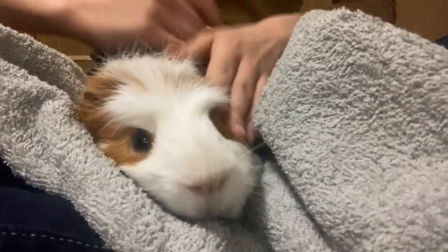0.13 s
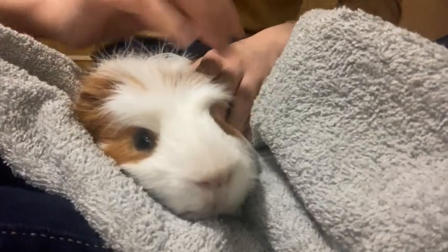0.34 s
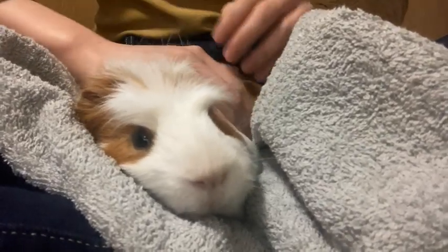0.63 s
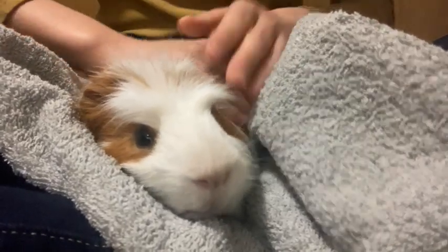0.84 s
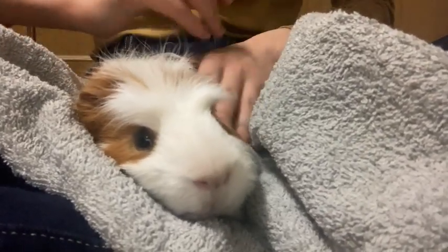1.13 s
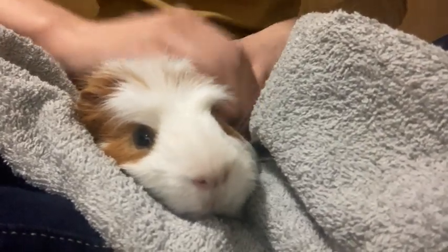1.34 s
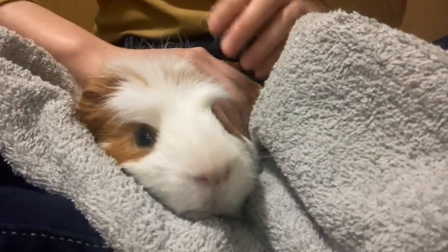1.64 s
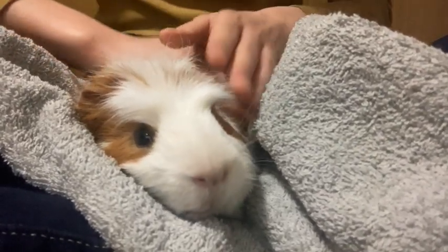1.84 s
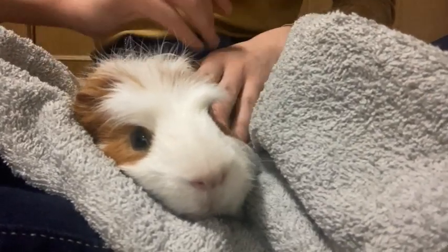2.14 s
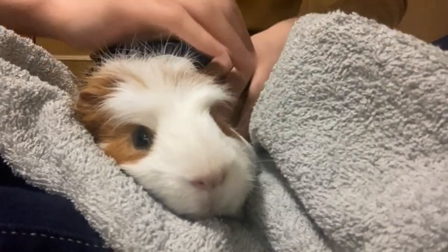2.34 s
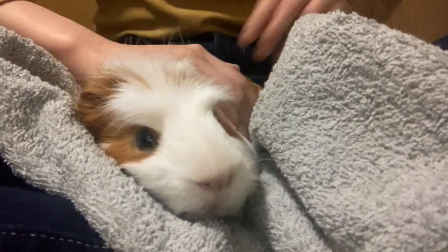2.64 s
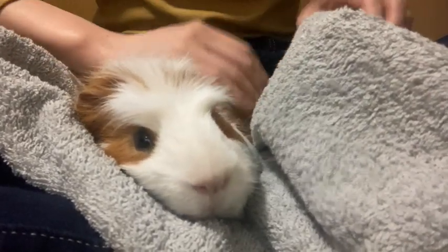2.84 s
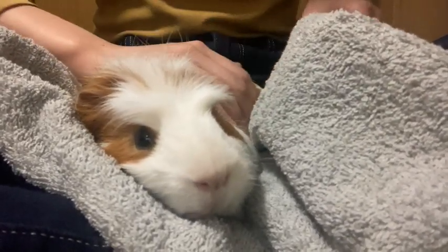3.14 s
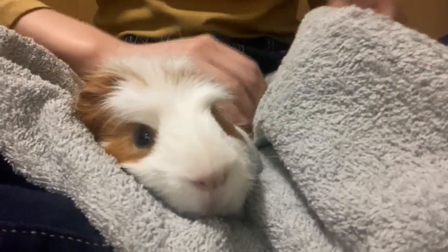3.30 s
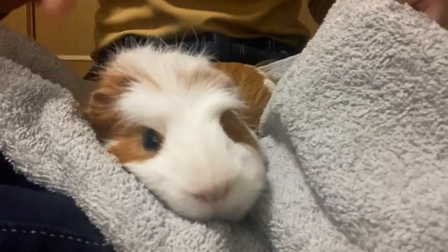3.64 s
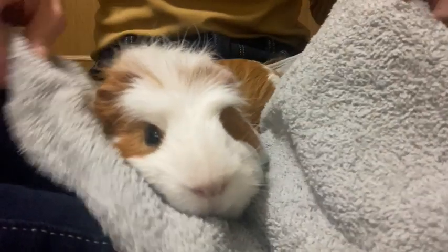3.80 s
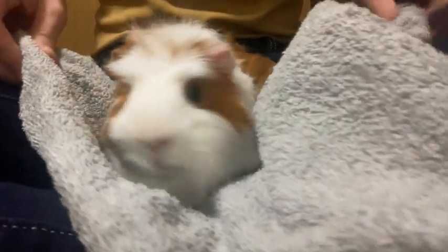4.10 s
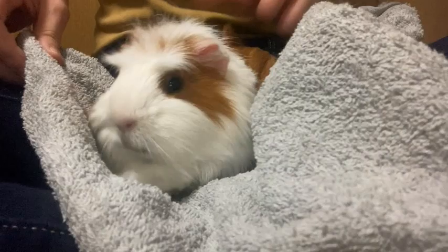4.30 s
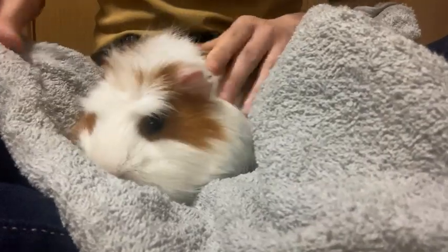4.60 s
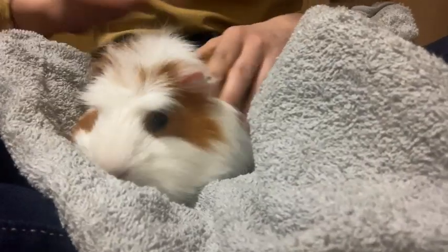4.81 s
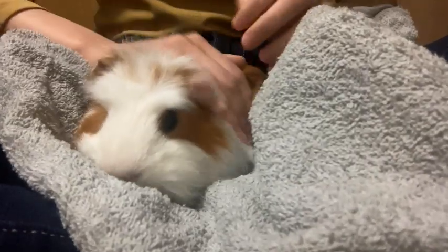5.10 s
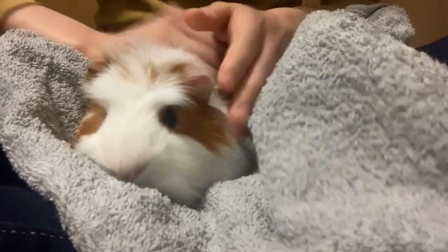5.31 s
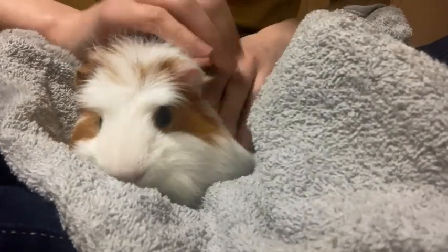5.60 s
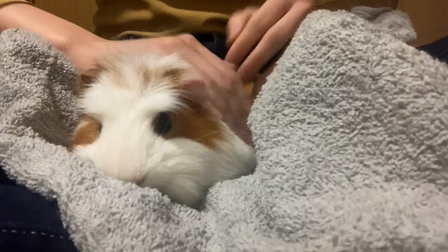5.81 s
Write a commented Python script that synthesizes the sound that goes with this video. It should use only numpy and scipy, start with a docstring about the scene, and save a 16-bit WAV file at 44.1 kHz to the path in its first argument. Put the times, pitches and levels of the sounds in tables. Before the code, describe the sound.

Soft, quick guinea pig chutting with little whistled flicks, over gentle fur and towel rustle and one towel shift, in a small indoor space.

```python
"""A small quiet room: a guinea pig wrapped in a towel on a lap chatters softly while a hand strokes its fur.
Most bouts open with one nasal swoop (catch, crest, trough, flick up to a whistle) and go on as a lower warble.
The voice is a sum of harmonics, strongest at mid pitch and rough at the bottom; lone flaps ring as creaks.
Fur and towel are shaped noise that swells with each stroke. Near four seconds the towel is shifted,
then the animal turns its head. Low room modes, short reflections and shaped air noise lie behind."""
import sys
import numpy as np
from scipy import signal
from scipy.fft import rfft, irfft
from scipy.io import wavfile
from scipy.ndimage import uniform_filter1d

SR = 44100
rng = np.random.default_rng(int(sys.argv[2]) if len(sys.argv) > 2 else 0)


def waveform_to_disk(signal):
    """Save audio, clipped to [-1, 1], as 16-bit WAV at the path in sys.argv[1]."""
    frames = np.transpose(np.atleast_2d(signal))
    scaled = np.clip(frames, -1, 1) * 32767
    samples = np.round(scaled).astype(np.int16)
    wavfile.write(sys.argv[1], SR, samples)


N = 262395
TIME = np.arange(N) / SR

# a near source at the two microphone ports, head forward: frequency_hz, left_minus_right_db
FORWARD_BALANCE = [(450, 0), (700, -2), (1000, -6), (1500, -13.5), (2000, -16.5), (2500, 2.5),
                   (3400, -12.5), (5500, -0.5)]
# the same place: frequency_hz, left_lead_radians
FORWARD_PHASE = [(100, -.1), (800, -.8), (1500, -.6), (2000, -1.8), (2800, -2.8), (3400, -2.5), (3900, 0),
                 (5700, 3), (8900, 6.2), (13500, 12.4), (16000, 15)]


def gain_of(db):
    """Decibels to an amplitude factor."""
    return 10 ** (np.asarray(db) / 20)


def evened(x):
    """Scaled to rms 1."""
    return x / np.sqrt(np.mean(x ** 2) + 1e-20)


def read(points, hz):
    """A table joined by straight lines on a log-frequency axis."""
    f, value = np.transpose(points)
    return np.interp(np.log(hz + 1), np.log(f + 1), value)


def add(mix, s, sound):
    """Lays a sound into the mix at time s."""
    part = mix[max(round(s * SR), 0):][:len(sound)]
    part += sound[:len(part)]


def colour(x, spectrum):
    """Filters by a table of frequency_hz, gain_db."""
    hz = np.fft.rfftfreq(N, 1 / SR)
    return irfft(rfft(x) * gain_of(read(spectrum, hz)), N)


def wander(rate_hz):
    """Smooth chance of rms 1: noise that fades out above the given rate."""
    hz = np.fft.rfftfreq(N, 1 / SR)
    return evened(irfft(rfft(rng.standard_normal(N)) / (1 + (hz / rate_hz) ** 4), N))


def noise_pair(side):
    """Left and right noise: a shared part plus an opposed part."""
    shared, opposed = rng.standard_normal((2, N))
    return np.array([shared + side * opposed, shared - side * opposed])


def ports(x, balance, lead):
    """The two microphone ports hear a near source with different level and phase."""
    hz = np.fft.rfftfreq(N, 1 / SR)
    tilt = gain_of(read(balance, hz) / 2) * np.exp(.5j * read(lead, hz))
    pair = np.array([tilt, 1 / tilt])
    power = np.mean(abs(pair) ** 2, 0)
    return irfft(rfft(x) * pair / np.sqrt(power), N)


def background(level_db=-70.5, lump_db=3):
    """Quiet room air as shaped noise; its rumble comes in soft lumps."""
    # spectrum of the room air: frequency_hz, relative_density_db
    air_spectrum = [(20, -20), (52, 8.5), (100, 0), (170, -7.5), (2000, -26), (7300, -35.5), (9000, -47),
                    (15500, -39)]
    air = gain_of(level_db) * evened(colour(noise_pair(0.26), air_spectrum))
    low_pass = signal.butter(2, 200, fs=SR, output="sos")
    rumble = signal.sosfiltfilt(low_pass, air)
    lumps = evened(gain_of(lump_db * wander(20.0)))
    return air - rumble + rumble * lumps


def scatter(wet_db, t60):
    """Sparse reflections that die away, different at each port."""
    t = np.arange(SR // 2) / SR
    taps = rng.standard_normal((2, len(t)))
    taps *= rng.random((2, len(t))) < .05  # one sample in twenty carries a reflection
    taps *= gain_of(-60 * t / t60) * (t > .003)
    return gain_of(wet_db) * taps / np.linalg.norm(taps[0])


def reflections(x):
    """A stronger and a fainter set of short reflections from the lap and the walls."""
    response = scatter(wet_db=-14, t60=0.19) + scatter(wet_db=-19, t60=0.16)
    return signal.fftconvolve(x[None], response, axes=1)[:, :N]


def ringing(x, modes_db=22.5):
    """Low modes of the room ring on when the pitch sweeps through them."""
    # low room resonances: frequency_hz, relative_level_db, t60_s
    room_modes = [(254.4, -8.5, 0.2), (294.6, -15.5, 0.23), (394.7, -26.5, 0.24), (434.2, -28.5, 0.33)]
    t = np.arange(SR // 2) / SR
    response = np.zeros(len(t))
    for hz, db, t60 in room_modes:
        even_peak = 2 * np.log(1000) / (t60 * SR)  # long and short rings get equal resonant gain
        response += gain_of(db - 60 * t / t60) * np.cos(2 * np.pi * hz * t) * even_peak
    return gain_of(modes_db) * signal.fftconvolve(x, response)[:N]


def rubbing(swell, lag_s=0.062, fullness=0.38):
    """Strength of rustle and fizz: the resting hand, the quiver of each call, and one arch for each stroke."""
    # firm strokes on fur and towel, before the trims: start_s, length_s, rustle_db, fine_fizz_db
    stroke_rows = [(-.05, 0.12, -69.5, -66), (0.402, 0.12, -79.5, -69.5), (0.773, 0.2, -75.5, -69),
                   (1.411, 0.29, -76, -71), (1.75, 0.2, -79.5, -65), (2.017, 0.048, -102, -73.5),
                   (2.85, 0.58, -76, -82), (3.688, 0.14, -66.5, -64.5), (3.818, .29, -65, -64),
                   (4.022, 0.14, -66.5, -73.5), (4.036, .012, -58.5, -76), (4.42, 0.1925, -77, -71),
                   (4.437, 0.063, -69, -68), (4.557, 0.063, -72.5, -66.5), (4.998, 0.34, -79.5, -74),
                   (5.2, .26, -101, -66)]
    # the hand lying on the fur, before the trims: rustle_db, fine_fizz_db
    rest_levels = (-88, -80)
    # the body rubs the towel as it calls, relative to the swell, before the trims: rustle_db, fine_fizz_db
    quiver_levels = (-38.5, -35)
    quiver = uniform_filter1d(swell, max(int(lag_s * SR), 1))
    power = gain_of(rest_levels)[:, None] ** 2 + np.outer(gain_of(quiver_levels), quiver) ** 2
    for start, length, *levels_db in stroke_rows:
        at = np.flatnonzero((TIME > start) & (TIME < start + length))
        arch = abs(np.sin(np.pi * (TIME[at] - start) / length)) ** fullness
        power[:, at] += np.outer(gain_of(levels_db), arch) ** 2
    return np.sqrt(power)


def stroking(swell, cloth_db=8, fizz_db=-1, grain_db=1.0, snag_db=-6, diffuse=0.53):
    """Countless fibres slip under the hand: a soft rustle, a fine fizz and a few snags."""
    # rustle spectrum: frequency_hz, relative_density_db
    cloth_spectrum = [(120, 1.5), (280, 17.5), (800, 6), (2500, 8), (4200, 1.5), (7500, -4.5), (9000, -1.5),
                      (15000, -25)]
    # fizz spectrum: frequency_hz, relative_density_db
    fizz_spectrum = [(5000, -10), (7700, -10), (8300, 3), (11000, 0.5), (13000, -5), (16000, -0.5)]
    # hairs and towel loops snapping free, before the snag trim: start_s, peak_db, nominal_length_s
    snag_rows = [(1.092, -49.5, 0.0037), (1.134, -57, 0.013), (1.207, -52.5, 0.0067),
                 (1.243, -55.5, 0.0098), (1.444, -53.5, 0.017), (1.534, -54.5, 0.0066),
                 (1.569, -51.5, 0.0057), (2.195, -55, 0.0083), (2.639, -55.5, 0.0058), (3.056, -56, 0.0054),
                 (3.55, -57, 0.0067), (3.6406, -47, .0032), (4.3987, -54.5, 0.0039)]
    rustle, fine = rubbing(swell)
    grain = evened(gain_of(grain_db * wander(250) + 0.74 * wander(34)))
    snags = np.zeros(N)
    for start, peak_db, length in snag_rows:
        u = np.arange(SR // 16) / SR / max(length / 2, .001)
        add(snags, start, gain_of(peak_db + snag_db) * u * np.exp(1 - u))
    cloth = rustle * gain_of(cloth_db) * grain
    fizz = np.hypot(fine * gain_of(fizz_db), snags) * grain
    # three independent noises: one placed under the hand, two spread left and right
    cloth_noise = evened(colour(rng.standard_normal((3, N)), cloth_spectrum))
    fizz_noise = evened(colour(rng.standard_normal((3, N)), fizz_spectrum))
    near, *scattered = cloth * cloth_noise + fizz * fizz_noise
    return ports(near, FORWARD_BALANCE, FORWARD_PHASE) + diffuse * np.array(scattered)


def thuds(centre_hz=263.8, detune=0.04):
    """Each soft thud is a few swelling and fading cycles of one low tone."""
    # low thuds among the calls and the handling: start_s, length_s, peak_db
    thud_rows = [(2.752, .03, -50), (3.238, 0.029, -48.5), (3.958, 0.022, -44.5), (4.17, .014, -57.5),
                 (4.379, 0.027, -45), (4.966, 0.031, -52.5)]
    out = np.zeros(N)
    for (s, length, db), off in zip(thud_rows, rng.standard_normal(len(thud_rows))):
        t = np.arange(0, length, 1 / SR)
        tone = np.sin(2 * np.pi * centre_hz * (1 + detune * off) * t)
        add(out, s, gain_of(db) * np.sin(np.pi * t / length) * tone)
    return out


def creak_run(start, end, first_rate, last_rate, peak_db, stumble_s=0.00081, spread_db=2):
    """Times and strengths of flaps that come ever faster, a little unevenly."""
    t = np.arange(start, end, 1 / SR)
    rate = np.linspace(first_rate, last_rate, len(t))
    cycles = np.floor(np.cumsum(rate) / SR)
    times = t[np.diff(cycles, prepend=-1) > 0]
    chance = rng.standard_normal(size=(32, 2))
    return [(s + stumble_s * late, peak_db + spread_db * size) for s, (late, size) in zip(times, chance)]


def creaks(trim_db=-3, detune=.12, spread_db=3):
    """Each lone flap of the vocal folds rings the throat for a few milliseconds, never twice alike."""
    # what a flap rings in throat and nose, before chance: frequency_hz, relative_level_db, t60_s
    flap_modes = [(251.4, -9.5, 0.12), (554.8, 6.5, 0.032), (1060.6, -0.5, 0.02), (2054, -3.5, 0.013)]
    # single slow flaps before a call: start_s, peak_db before the trim
    lone_flaps = [(.11, -36), (.488, -35), (1.777, -39.5), (2.138, -35), (4.174, -49.5), (4.331, -35),
                  (4.932, -48), (5.287, -45), (5.523, -44.5), (5.545, -35)]
    # a quickening run of flaps: start_s, end_s, first_flaps_per_s, last_flaps_per_s, peak_db before spread and trim
    quickening = (4.949, 5.024, 130, 200, -38.5)
    out, t = np.zeros(N), np.arange(SR // 16) / SR
    flaps = list(lone_flaps) + creak_run(*quickening)
    chances = rng.standard_normal(size=(40, len(flap_modes), 3))
    for (s, db), chance in zip(flaps, chances):
        ring = np.zeros(len(t))
        for (hz, mode_db, t60), (off, size, phase) in zip(flap_modes, chance):
            decay = gain_of(mode_db + spread_db * size - 60 * t / t60)
            ring += decay * np.sin(2 * np.pi * (hz * (1 + detune * off) * t + phase))
        ring *= 1 - np.exp(-(t / 0.0003) ** 2)  # soft onset
        add(out, s, gain_of(db + trim_db) * ring / abs(ring).max())
    return out


def glide(s, value, t):
    """A smooth curve through the rows that levels off at each turning point."""
    slope = np.diff(value) / np.maximum(np.diff(s), 1e-4)
    before, after = np.r_[slope[0], slope], np.r_[slope, slope[-1]]
    same_way = before * after > 0
    tangent = np.sign(before) * np.minimum(abs(before), abs(after)) * same_way
    i = np.clip(np.searchsorted(s, t) - 1, 0, len(s) - 2)
    span = s[i + 1] - s[i]
    u = np.clip((t - s[i]) / (span + 1e-9), 0, 1)
    bow = (1 - u) * (tangent[i] - slope[i]) - u * (tangent[i + 1] - slope[i])
    return np.interp(t, s, value) + span * u * (1 - u) * bow


def swoop(start, length, crest_at, trough_at, catch_hz, crest_hz, trough_hz, top_hz, level_db, rough, release_s):
    """The pitch catches low, arches, sags, then flicks up to a whistle and is let go."""
    catch_at, catch_drop = 0.27, 1.3  # the catch's share of the way to the crest; start pitch over catch pitch
    rise_db = 2.5  # a swoop gathers strength up to its listed level
    s = start + length * np.array([0, catch_at * crest_at, crest_at, trough_at, 1])
    turns = list(zip(s, [catch_drop * catch_hz, catch_hz, crest_hz, trough_hz, top_hz]))
    turns.append((s[-1] + release_s / 2, top_hz))
    return level_db - rise_db, rise_db, rough, turns


def calling(release_s=.008):
    """Pitch, strength and roughness of the voice through time; strength falls away from the easy pitch."""
    # opening swoops, level before pitch losses and voice gain: start_s, length_s, crest_at_0_to_1, trough_at_0_to_1,
    # catch_hz, crest_hz, trough_hz, top_hz, end_level_db, base_roughness_0_to_1
    swoop_rows = [ (0.375, 0.091, 0.21, 0.59, 378.8, 656.3, 417, 892.7, -43, 0.09),
                  (0.800, 0.079, 0.32, 0.67, 313, 700, 304.4, 867, -37.5, 0.19),
                  (1.085, 0.097, 0.24, 0.64, 431.9, 583, 353.3, 1125, -34.5, 0.2),
                  (1.400, 0.084, 0.2, 0.81, 542, 591.6, 389.5, 1248, -35.5, .1),
                  (1.777, 0.094, 0.32, 0.74, 368.2, 595, 312.4, 1277, -36, 0),
                  (2.138, 0.094, 0.31, 0.72, 274.2, 569.8, 365.6, 1170, -35.5, 0.14),
                  (2.587, .091, .28, .64, 300.3, 742, 337, 1171, -39, .2),
                  (2.995, 0.093, 0.29, 0.62, 371.1, 721, 340.3, 1027, -37.5, 0.3),
                  (3.418, 0.085, 0.26, 0.67, 281.5, 705.8, 376.8, 1260, -36, 0.36), ]
    # warbles, level before pitch losses and voice gain:
    # start_level_db, change_by_end_db, base_roughness_0_to_1, pitch turns as (time_s, pitch_hz)
    warble_rows = [ (-35, -6.5, 0.039, [(0, 424), (.035, 382), (.06, 544), (.076, 450)]),
                   (-45, -2.5, 0.18, [(.11, 457), (.119, 260), (.133, 566), (.168, 436), (.192, 736)]),
                   (-41.5, 5, 0.11, [(.488, 528.4), (.508, 354), (.527, 536), (.541, 458), (.556, 597),
                   (.581, 514), (.599, 841), (.623, 443), (.644, 442.4), (.667, 1050)]),
                   (-36, -5, 0.26, [(.88, 855), (.899, 508.2), (.91, 543.4), (.924, 374.3), (.957, 541.3),
                   (.972, 851)]), (-34.5, 0, .25, [(1.197, 661.5), (1.211, 400), (1.227, 501), (1.245, 341),
                   (1.258, 617.3), (1.283, 878)]), (-39, 1.5, 0.044, [(1.51, 641), (1.523, 383),
                   (1.55, 423.7), (1.575, 619.7), (1.59, 1049), (1.612, 618), (1.629, 404.5), (1.646, 508),
                   (1.663, 927)]), (-36.5, -8.5, 0.34, [(1.889, 662), (1.907, 369.6), (1.924, 420),
                   (1.942, 329), (1.965, 837), (1.992, 654.5)]), (-37, -8.5, 0.27, [(2.233, 1165),
                   (2.247, 718), (2.265, 370.8), (2.281, 446.8), (2.309, 407), (2.336, 748), (2.41, 675.4),
                   (2.443, 1208)]), (-36.5, -8, 0.229, [(2.678, 1170), (2.708, 464), (2.762, 432),
                   (2.796, 942), (2.816, 591.7), (2.848, 817)]), (-41.5, 2.5, 0.27, [(3.081, 1036),
                   (3.103, 441.6), (3.14, 447.4), (3.177, 1060), (3.209, 330.2), (3.228, 486.8),
                   (3.256, 554), (3.285, 1001)]), (-34, -4.5, 0.13, [(3.528, 591.7), (3.539, 471.4),
                   (3.564, 366), (3.587, 600), (3.6, 1003), (3.611, 850)]), (-36.5, -3, 0.24, [(3.632, 577),
                   (3.644, 251), (3.663, 594.3), (3.679, 445.3), (3.716, 880)]),
                   (-41, 4, 0.26, [(3.85, 270), (3.87, 638), (3.89, 628.5), (3.908, 270.2), (3.922, 740),
                   (3.943, 305)]), (-35.5, -8, 0.25, [(3.955, 508), (3.968, 279), (3.99, 443.3),
                   (4.022, 274)]), (-43, 4, 0.37, [(4.346, 582), (4.359, 688), (4.382, 491.4), (4.397, 256),
                   (4.422, 587), (4.439, 642)]), (-49.5, -0.5, 0.85, [(4.645, 586), (4.66, 722),
                   (4.679, 555), (4.7, 839), (4.72, 996)]), (-45.5, 6.5, 0.14, [(4.747, 510),
                   (4.776, 600)]), (-39, -3.5, 0.23, [(4.779, 581.4), (4.807, 774)]),
                   (-42, 4.5, 0.39, [(5.024, 899), (5.036, 1575), (5.058, 421), (5.099, 673), (5.116, 600),
                   (5.139, 1055)]), (-45.5, -5, 0.28, [(5.288, 300), (5.305, 243), (5.32, 410.5),
                   (5.347, 526), (5.363, 459), (5.386, 1009)]), (-48, 2, 0.071, [(5.382, 991), (5.404, 670),
                   (5.438, 693)]), (-39, -5, 0.72, [(5.563, 702), (5.588, 366)]),
                   (-39, -7, 0.4, [(5.59, 417.2), (5.61, 568.8), (5.633, 795.6), (5.677, 429),
                   (5.701, 635.7), (5.724, 387.3), (5.77, 650)]), (-54, 7, 0.093, [(5.765, 650),
                   (5.778, 747), (5.805, 582), (5.828, 748)]), ]
    easy_hz, slack_db, taut_db = 532, 10, 2.5  # strongest pitch; loss one octave below and above it
    let_go_db, let_go_oct_per_s = 0.5, 49  # the voice slackens when the pitch drops this fast
    flick_db, flick_oct_per_s = 2, 150  # it also thins when the pitch climbs this fast
    swoop_attack_s, warble_attack_s = 0.0055, 0.0012  # swoops start more gently
    end_rough = 0.18  # roughness gained as a call runs out
    pitch, swell, roughness = np.zeros((3, N))
    calls = [(swoop_attack_s, *swoop(*row, release_s)) for row in swoop_rows]
    calls += [(warble_attack_s, *row) for row in warble_rows]
    for attack_s, level_db, change_db, rough, turns in calls:
        s, hz = np.transpose(turns)
        at = np.arange(max(int(s[0] * SR), 0), min(int(s[-1] * SR), N))
        t, u = TIME[at], np.linspace(0, 1, len(at))
        pitch[at] = glide(s, hz, t)
        octaves = np.log2(pitch[at] / easy_hz)
        climb = np.gradient(octaves, t)
        effort_db = level_db + change_db * u
        effort_db -= np.where(octaves < 0, slack_db, taut_db) * octaves ** 2
        effort_db -= let_go_db * np.clip(-climb / let_go_oct_per_s, 0, 1) ** 2
        effort_db -= flick_db * np.clip(climb / flick_oct_per_s, 0, 1)
        gate = np.clip((t - s[0]) / attack_s, 0, 1) * np.clip((s[-1] - t) / release_s, 0, 1)
        swell[at] = np.maximum(swell[at], gain_of(effort_db) * gate)
        roughness[at] = rough + end_rough * u ** 5
    return pitch, swell, roughness


def voice(pitch, swell, roughness, jitter=0.03482, shimmer=0.64, doubling=0.33, rasp=1.56,
          overtone_db=-10.5, fall_db=-1.5, blur_db=-4, uneven_db=3.0,
          break_hz=330, break_rough=0.21, whistle_hz=950, press=0.32):
    """Harmonics of the folds pass the throat; when rough, cycles wobble, alternate in strength and leak air."""
    # the closed mouth and nose: frequency_hz, gain_db
    throat = [(150, -11.5), (300, -0.5), (800, -1.5), (1300, 0.5), (1650, -2), (2000, -5), (2400, -5.5),
              (2800, -22.5), (3300, -16), (4500, -52), (7000, -56)]
    out, leak = np.zeros((2, N))
    wobble, flutter, split = wander(186.7), wander(160), wander(47)
    air = rng.standard_normal(N)
    uneven = [wander(27) for k in range(8)]  # one waver for each overtone
    at = np.flatnonzero(swell > 0)
    hz, effort_db = pitch[at], 20 * np.log10(swell[at])
    slack = break_rough / (1 + (hz / break_hz) ** 10)  # slack folds lose their beat
    rough = np.clip(roughness[at] + slack, 0, 1)
    rough = rough / (1 + (hz / whistle_hz) ** 6)  # taut folds whistle cleanly
    turns = np.cumsum(hz * (1 + jitter * (0.345 + 2 * rough) * wobble[at])) / SR
    tone = gain_of(read(throat, hz)) * np.cos(2 * np.pi * turns)
    # soft calls close the folds gently and sound duller
    slope_db = fall_db + press * np.minimum(effort_db + 35.5, 0)
    for k, waver in enumerate(uneven, 2):
        source_db = overtone_db + slope_db * (k - 2) + blur_db * rough + uneven_db * waver[at]
        harmonic = np.cos(2 * np.pi * k * turns - .5 * (k - 1))
        tone += gain_of(source_db + read(throat, k * hz)) * harmonic
    alternation = doubling * (1 + .5 * split[at]) * np.cos(np.pi * turns)  # every other cycle is stronger
    tone *= 1 + rough * (shimmer * flutter[at] + alternation)
    out[at] = np.sqrt(2) * swell[at] * tone / np.sqrt(1 + .5 * rough ** 2)
    puff = np.exp(2 * (np.cos(2 * np.pi * turns) - 1))  # one puff a cycle
    leak[at] = swell[at] * (0.28 + rough) * air[at] * puff
    return out + rasp * colour(leak, throat)


def scene():
    """The animal close by, the stroking hand, the room and its quiet background."""
    # the animal at the two ports, head turned: frequency_hz, left_minus_right_db
    turned_balance = [(400, .5), (1000, -3), (1650, -6), (2300, 0), (3400, -4)]
    # the same place: frequency_hz, left_lead_radians
    turned_phase = [(100, -.1), (500, -.15), (1200, .23), (2000, -1.45), (2800, -.99), (3600, -2.8)]
    # brighter once the head has turned: frequency_hz, gain_db
    turned_lift = [(1900, 0), (2500, -1.5), (3200, 8.5), (5000, 23)]
    head_turn_s = 4.25
    pitch, swell, roughness = calling()
    animal = gain_of(-1.37) * voice(pitch, swell, roughness) + creaks() + thuds()
    near = animal + ringing(animal)
    turned = np.clip((TIME - head_turn_s) * 20, 0, 1)  # the turn takes 50 ms
    facing = ports(near * (1 - turned), FORWARD_BALANCE, FORWARD_PHASE)
    aside = ports(colour(near * turned, turned_lift), turned_balance, turned_phase)
    return facing + aside + reflections(animal) + stroking(swell) + background()


def record(dry, edge_hz=15720):
    """The recorder's band limit: a steep low-pass filter."""
    low_pass = signal.firwin(511, edge_hz, window=("kaiser", 9), fs=SR)
    return signal.oaconvolve(dry, low_pass[None], "same")


dry = scene()
out = record(dry)
waveform_to_disk(out)
```